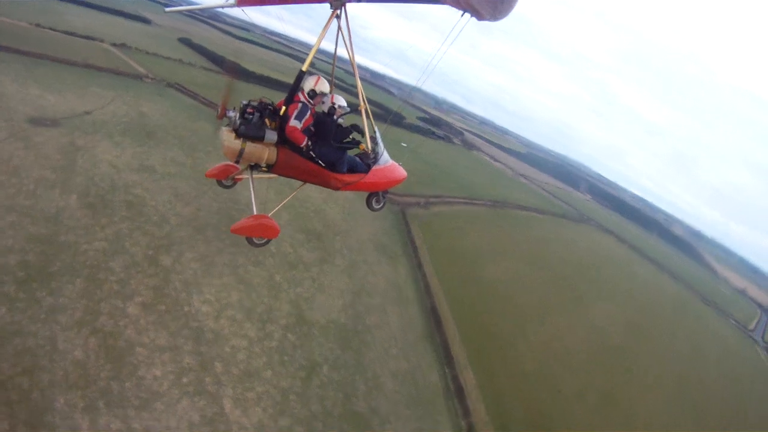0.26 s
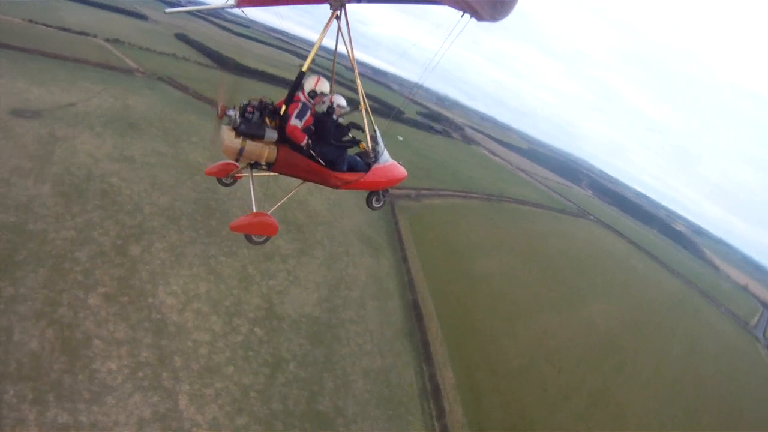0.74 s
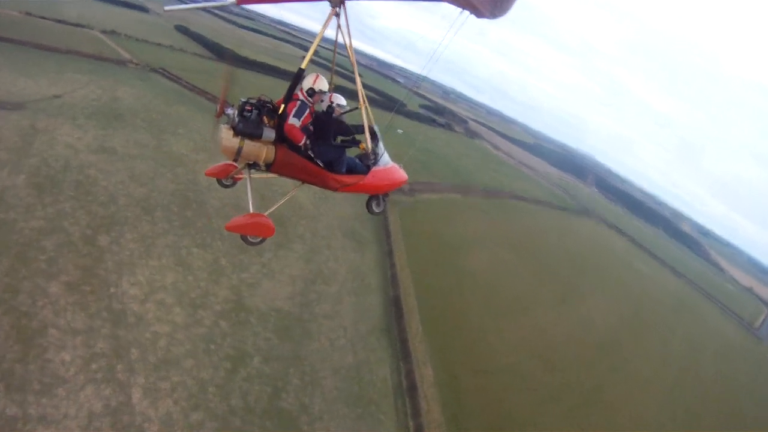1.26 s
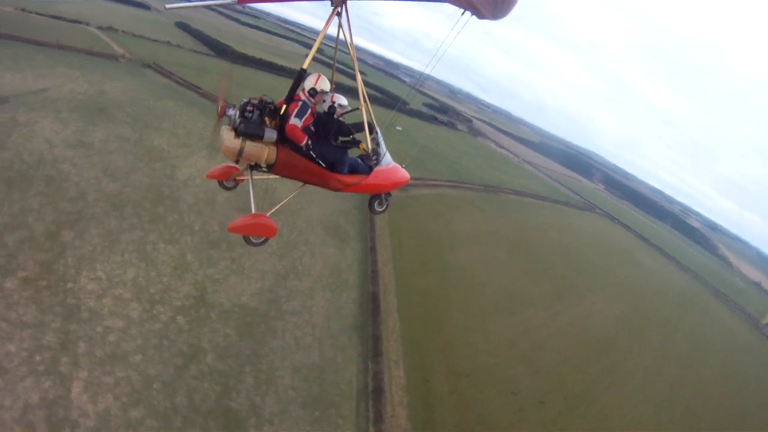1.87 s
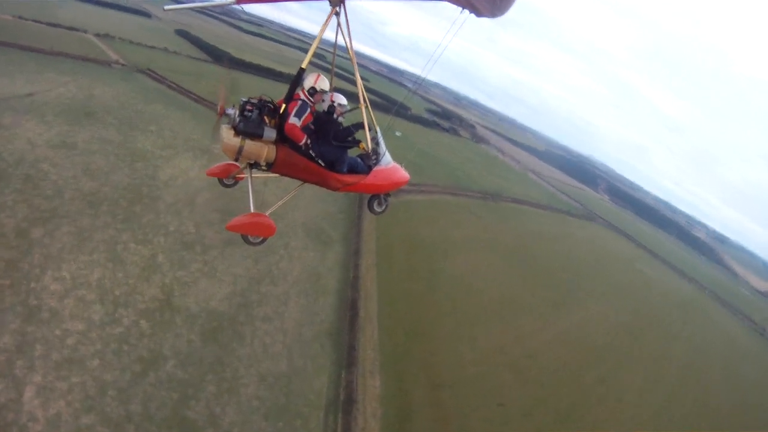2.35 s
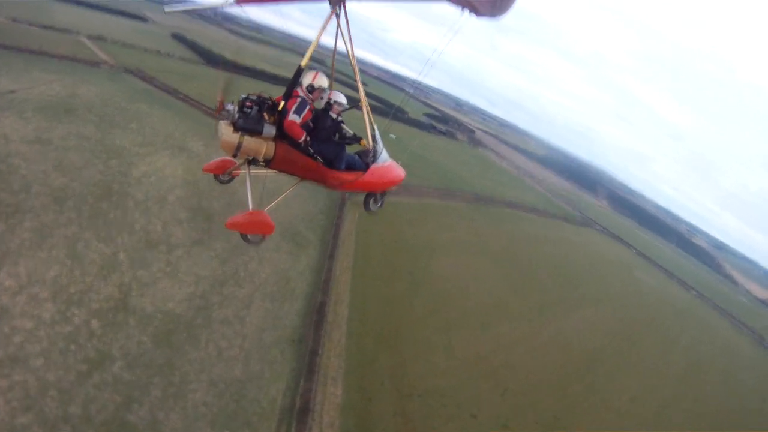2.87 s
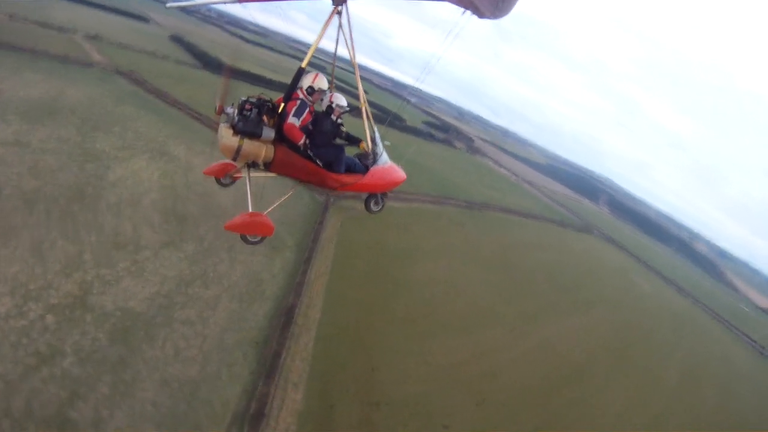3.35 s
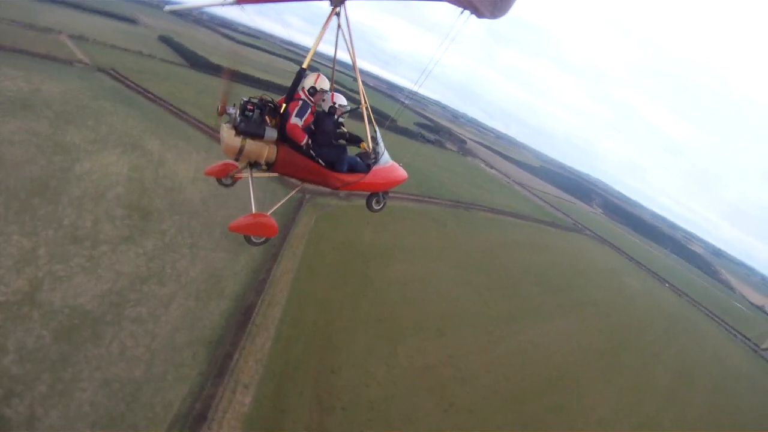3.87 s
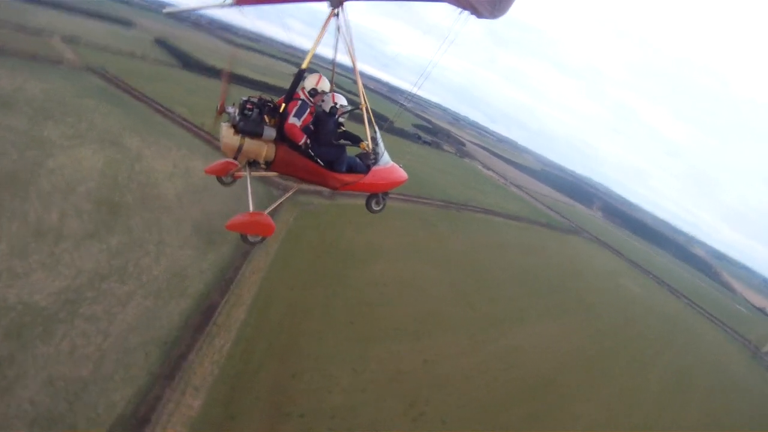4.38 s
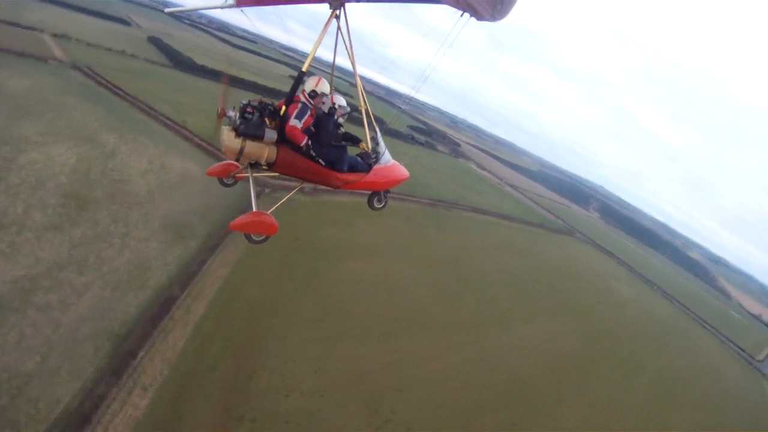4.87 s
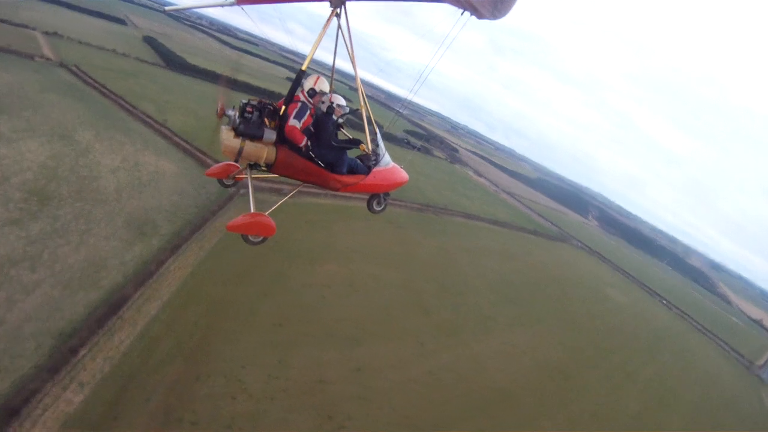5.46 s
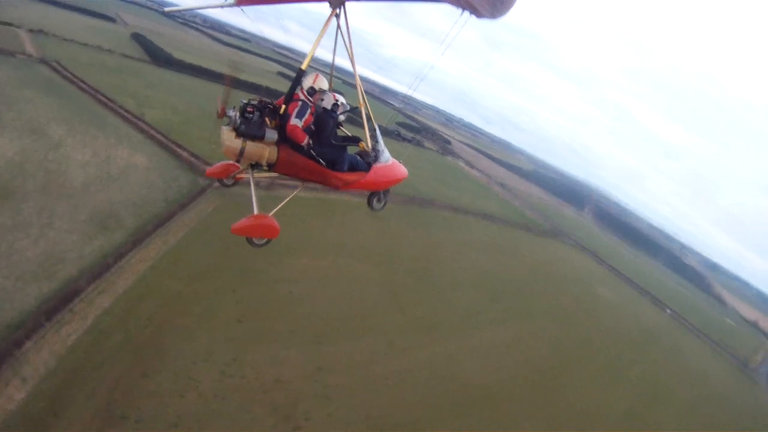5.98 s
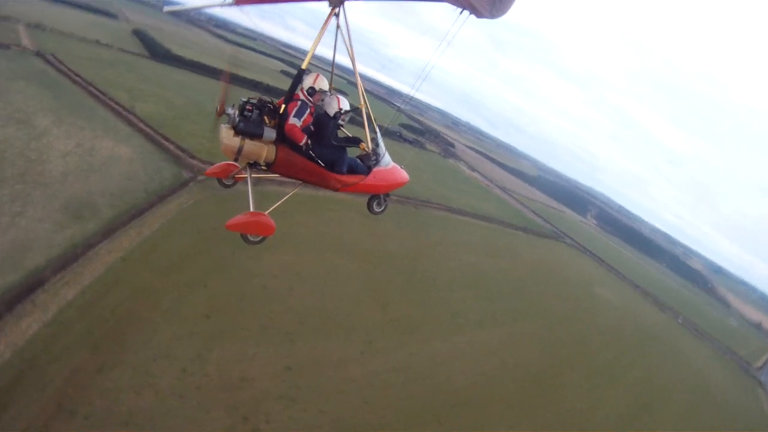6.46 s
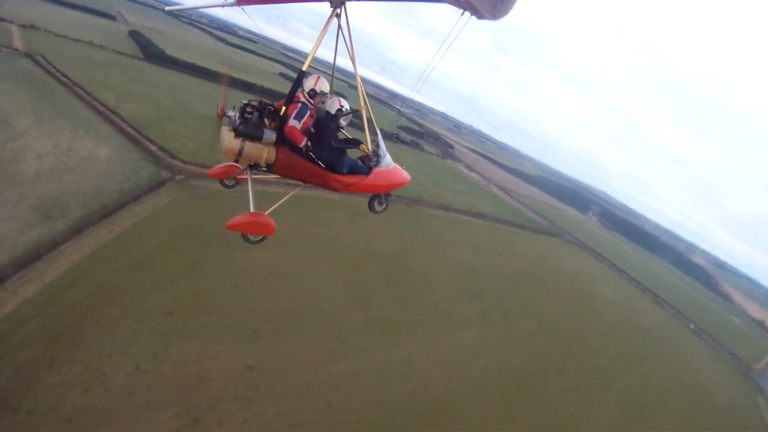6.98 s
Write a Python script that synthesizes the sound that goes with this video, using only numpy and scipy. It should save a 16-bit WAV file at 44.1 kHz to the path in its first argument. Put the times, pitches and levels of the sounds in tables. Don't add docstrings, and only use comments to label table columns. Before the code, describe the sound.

Steady, buzzing small-aircraft drone heard through the airframe, throbbing and pulsing irregularly while wind rumbles and a loose part rattles and knocks.

```python
import sys
import numpy as np
from scipy import signal
from scipy.fft import rfft, irfft, next_fast_len
from scipy.io import wavfile
from scipy.ndimage import uniform_filter1d

SR = 44100
rng = np.random.default_rng(int(sys.argv[2]) if len(sys.argv) > 2 else 0)


def digitize_waveform(pressure):
    field = np.atleast_2d(pressure).T
    bounded = np.clip(field, -1, 1)
    quanta = np.round(bounded * 32767).astype(np.int16)
    wavfile.write(sys.argv[1], SR, quanta)


def boost_factor(decibels):
    exponent = np.asarray(decibels, float) / 20
    return 10 ** exponent


N = 318843

# start_s [s], peak_db [dB], pitch_hz [Hz]
LOUD_KNOCKS = [(0.0521, -6, 1240), (0.084, -3.5, 1170), (0.1252, -4.5, 1210), (0.5663, -4, 1200),
               (0.6403, -6, 1260), (0.7518, -11, 1090), (1.055, -5.5, 1240), (1.6336, -1.5, 1205),
               (1.7282, -7, 1210), (1.766, -4.5, 1130), (1.899, -6, 1214), (1.9608, -4, 1150),
               (2.056, -4.5, 1200), (2.215, -2.5, 1180), (2.3472, -8, 1200), (2.8669, -5, 1230),
               (2.904, -2, 1160), (4.4, -6.5, 1140), (4.5267, -6, 1140), (4.7245, -5.5, 1170),
               (4.794, -1.5, 1170), (5.3, -8, 1170), (5.6264, -6, 1200), (6.0505, -3.5, 1150),
               (6.0825, -8, 1180), (6.1555, 0, 1240), (6.318, -9, 1200), (6.9534, -4, 1210),
               (7.094, 1.5, 1190), (7.168, -1, 1220)]
# centre_s [s], depth_db [dB], length_s [s], following_swell_db [dB]
SWING_LULLS = [(0.049, 11, 0.025, -17.5), (.54, 3, 0.033, -18), (0.693, 10, .025, -17),
               (0.849, 5, 0.033, -18), (1.37, 10, 0.041, -15.5), (1.547, 20, 0.038, -17),
               (1.705, 6, .03, -18), (2.062, 17, 0.014, -18.5), (2.29, 20, 0.039, -16.5),
               (2.837, 9, 0.027, -16.5), (2.966, 17, 0.026, -13), (3.1, 12, 0.045, -18),
               (3.381, 6, .04, -15), (3.51, 10, 0.029, -18), (3.683, 23, 0.038, -15.5),
               (3.874, 12, 0.032, -20), (4.101, -1, 0.045, -17.5), (4.23, 8, .03, -19),
               (4.59, 8, 0.043, -16), (4.726, 22, 0.037, -16.5), (4.98, 13, 0.045, -14),
               (5.14, 13, .05, -16), (5.321, 7, 0.047, -17), (5.683, 9, 0.064, -15.5),
               (5.904, 12, 0.022, -12.5), (5.994, 24, 0.038, -17), (6.115, 15, .025, -18.5),
               (6.46, 14, 0.034, -18), (6.794, 7, 0.049, -17), (7.01, 4, .07, -18)]


def rms_one(x):
    return x / np.sqrt(np.mean(x ** 2) + 1e-20)


def drift(rate_hz):
    r = np.exp(-80 * np.pi * rate_hz / SR)
    noise = rng.standard_normal(N // 40 + 2002)
    slow = signal.lfilter([1], [1, -2 * r, r * r], noise)[2000:]
    return np.interp(np.arange(N) / 40, np.arange(len(slow)), rms_one(slow))


def coloured(spectrum):
    size = next_fast_len(N)
    hz = np.arange(1, size // 2 + 2) * SR / size
    point_hz, point_db = np.transpose(spectrum)
    shape = boost_factor(np.interp(np.log(hz), np.log(point_hz), point_db, left=-200, right=-200))
    return rms_one(irfft(rfft(rng.standard_normal(size)) * shape, size)[:N])


def singing(edges_hz, evenness):
    band = signal.butter(2, edges_hz, "band", fs=SR, output="sos")
    x = signal.sosfilt(band, rng.standard_normal(N + 9000))[9000:]
    flicker = np.sqrt(uniform_filter1d(rms_one(x) ** 2, int(0.028 * SR)) + 0.26)
    return rms_one(x / flicker ** evenness)


def tones(turns, orders, levels_db, waver_db, slip):
    wobble = [drift(3.0) for _ in range(5)]
    total = np.zeros(N)
    for k, (order, db) in enumerate(zip(orders, levels_db)):
        gain = boost_factor(db + 3.5 + waver_db * wobble[k % 5])
        phase = order * turns + rng.random() + slip * wobble[(k + 2) % 5]
        total += gain * np.sin(2 * np.pi * phase)
    return total


def ring(clicks, hz, t60):
    r, w = boost_factor(-60 / (t60 * SR)), 2 * np.pi * hz / SR
    return signal.lfilter([0, np.sin(w)], [1, -2 * r * np.cos(w), r * r], clicks + 1e-18)


def bumps(s, rise_db, length_s):
    t = np.arange(0, N + 64, 64)[:, None] / SR
    rise = np.sum(rise_db * np.exp(-((t - s) / length_s) ** 2), axis=1)
    return np.interp(np.arange(N) / SR, t[:, 0], rise)


def shake():
    # centre_s [s], length_s [s], buzz_rise_db [dB], boom_rise_db [dB]
    gusts = [(0.07, 0.077, 2.5, 2), (0.31, 0.061, 5.5, 6.5), (0.61, 0.082, 3, 3), (0.758, 0.034, 6.5, 5),
             (0.99, 0.1, 2, 1), (1.258, .07, 4, 2.5), (1.39, 0.067, 5, 9.5), (1.63, 0.091, 3.5, 4),
             (1.765, .05, 2.5, 3.5), (1.958, 0.052, 4, 9), (2.156, 0.11, 4.5, 2), (2.319, 0.072, 6, 6.5),
             (2.96, 0.17, 3, 7), (3.217, 0.068, 4, 6), (3.406, 0.067, 5.5, 5), (3.56, 0.049, 4, 8.5),
             (3.74, 0.064, 3.5, 4.5), (3.924, 0.047, 2.5, 8), (4.102, .06, 5, 7), (4.27, 0.036, 3, 8),
             (4.408, 0.067, 4, 1), (4.594, 0.073, 4, 8.5), (4.796, 0.067, 5.5, 8.5),
             (5.002, 0.037, 2.5, 11), (5.29, 0.26, 3, 5.5), (5.708, 0.095, 5, 10), (6.083, 0.086, 5, 6.5),
             (6.321, 0.02, 6, 8.5), (6.51, 0.087, 6, 7.5), (7.035, 0.28, 3, 4)]
    # centre_s [s], rise_db [dB]
    hums = [(0.0, 8), (.2, 9), (.4, 7), (.765, 13), (1.06, 21.5), (1.38, 20), (1.6, 13), (2.13, 3),
            (2.32, 20), (2.89, 12), (3.07, 1), (3.4, 15.5), (3.57, 13), (3.74, 12.5), (3.98, 6), (4.35, 11),
            (4.67, 4), (4.845, 6), (5.1, 9), (5.27, 9), (5.44, -5), (5.72, 14), (5.85, 11), (6.12, 16),
            (6.37, 14), (6.55, 8), (6.75, 20), (7.05, 12.5), (7.22, 18.5)]
    s, length_s, buzz_rise_db, boom_rise_db = np.transpose(gusts)
    hum_s, hum_rise_db = np.transpose(hums)
    buzz_db = -32 + bumps(s, buzz_rise_db, length_s)
    boom_db = -27 + bumps(s, boom_rise_db, length_s)
    hum_db = -36 + bumps(hum_s, hum_rise_db, 0.074)
    return buzz_db, boom_db, hum_db


def wind_buffet(hum_db):
    # freq_hz [Hz], density_db [dB per Hz]
    buffet_spectrum = [(20, -34), (30, -14), (46, -3), (58, -3), (68, -9), (82, -11), (99, -8), (112, -9),
                       (128, -11), (150, -13), (200, -40), (330, -120)]
    return boost_factor(-26.5 + 0.25 * (hum_db + 36.5)) * coloured(buffet_spectrum)


def strut_hum(hum_db):
    return boost_factor(-28 + 0.63 * (hum_db + 27.5)) * singing((94, 104), evenness=0.59)


def case_boom(boom_db):
    # freq_hz [Hz], density_db [dB per Hz]
    boom_spectrum = [(74, -27), (125, -14.5), (156, -8), (186, -5), (228, -6.5), (250, -3), (272, -45),
                     (300, -29), (325, -25), (385, -42), (520, -29), (620, -35), (810, -39), (1360, -120)]
    boom = boost_factor(-23 + 0.42 * (boom_db + 24.5)) * coloured(boom_spectrum)
    mode = boost_factor(-28 + 1.6 * (boom_db + 22)) * singing((226, 254), evenness=.5)
    return boom + mode


def airframe_noise(cycles):
    # freq_hz [Hz], density_db [dB per Hz]
    buzz_spectrum = [(350, -10), (600, -18), (648, -1), (674, 3), (849, -2), (917, -5.5), (1070, -1),
                     (1220, -0.5), (1270, 1.5), (1340, -11), (1400, -10), (1610, 2), (1770, -8),
                     (1900, -3.5), (2470, -38), (4180, -120)]
    # freq_hz [Hz], density_db [dB per Hz]
    whine_spectrum = [(1060, -24.5), (1800, -13.5), (2070, -5.5), (2180, -4.5), (2400, -12), (2640, -9),
                      (2800, -12), (3040, -27), (3100, -39), (4030, -27.5), (6820, -120)]
    # freq_hz [Hz], density_db [dB per Hz]
    hiss_spectrum = [(2500, -45), (3000, -11), (3470, -3), (3720, -11.5), (3870, -11.5), (4150, -21),
                     (4430, -17), (4600, -10.5), (4750, -14), (4900, -9), (5120, -14.5), (5280, -12),
                     (5480, -16), (5820, -16.5), (6300, -32)]
    firing = 1 + .12 * np.cos(4 * np.pi * cycles) + .1 * np.cos(8 * np.pi * cycles)
    buzz = boost_factor(-28.5 + 0.37 * drift(21)) * coloured(buzz_spectrum)
    whine = boost_factor(-30.5 + 0.48 * drift(25)) * coloured(whine_spectrum) * firing ** 0.19
    hiss = boost_factor(-40 + .5 * drift(30)) * coloured(hiss_spectrum) * firing
    flutter = boost_factor(1.1 * drift(40))
    return flutter * (buzz + whine + hiss)


def knock_jolt():
    knock_s, knock_db, _ = np.transpose(LOUD_KNOCKS)
    return boost_factor(bumps(knock_s, 1 + .2 * knock_db, 0.036))


def propeller(cycles):
    blade_orders = [1, 2, 5, 9, 11, 17, 18, 20, 24, 29, 34, 36]
    blade_levels = [-41, -31, -60, -54, -56, -47, -50, -50, -50, -56, -64, -62]
    shaft = 2 / 2.325
    return boost_factor(2.0) * tones(3 * shaft * cycles, blade_orders, blade_levels, waver_db=1.0, slip=0.028)


def engine_cycles():
    # time_s [s], rate_hz [cycles per s]
    engine_speed = [
        (0.0, 35.532),
        (0.8, 35.94),
        (1.3, 36.19),
        (1.9, 36.32),
        (2.8, 36.345),
        (4.4, 36.32),
        (5.2, 36.395),
        (6.0, 36.292),
        (7.25, 36.145),
    ]
    s, rate_hz = np.transpose(engine_speed)
    return np.cumsum(np.interp(np.arange(N) / SR, s, rate_hz)) / SR


def engine(cycles):
    engine_orders = [.575, 2, 12, 29.5, 41, 46, 47, 49, 51, 53, 57, 58, 59, 61, 63, 65, 67, 71, 78, 79, 80,
                     81, 86, 88, 90, 92, 99]
    engine_levels = [-36, -38, -62, -49, -50, -48, -55, -58, -55, -50, -50, -52, -42, -48, -53, -52, -57,
                     -55, -60, -58, -52, -63, -64, -61, -62, -64, -64]
    return boost_factor(2.05) * tones(cycles, engine_orders, engine_levels, waver_db=2.0, slip=0.11)


def swing_angle(cycles):
    mount = .838
    lulls = np.zeros(N)
    lulls[(np.array(SWING_LULLS)[:, 0] * SR).astype(int)] = np.pi
    lost = uniform_filter1d(np.cumsum(lulls), int(.02 * SR))
    return np.pi * (1 + mount) * cycles - lost + 2 * np.pi * .1 * drift(3.0)


def swing_level():
    sag_db, sag_s, edge_s = 5.0, 0.058, .03
    s, depth_db, length_s, swell_db = np.transpose(SWING_LULLS)
    t = np.arange(N) / SR
    last = np.maximum(np.searchsorted(s, t) - 1, 0)
    swell = swell_db[last] + 8 - sag_db * (1 - np.exp(-np.abs(t - s[last]) / sag_s))
    return uniform_filter1d(swell, int(edge_s * SR)) - bumps(s, depth_db, length_s)


def taps(buzz_db):
    swing_s = .0329
    loud_s = np.append(np.array(LOUD_KNOCKS)[:, 0], N / SR)
    gaps = []
    for a, b in zip(loud_s, loud_s[1:]):
        swings = max(round((b - a) / swing_s), 1)
        gaps.append(np.linspace(a, b, swings + 1)[1:-1])
    s = np.concatenate(gaps)
    chance = rng.standard_normal((len(s), 3))
    gust_db = buzz_db[(s * SR).astype(int)] + 28.0
    db = -14.5 + 0.83 * gust_db + 7.5 * np.minimum(chance[:, 0], 1)
    pitch_hz = 1200 + 41 * chance[:, 1]
    return np.c_[s + .002 * chance[:, 2], db, pitch_hz]


def loose_part(angle, buzz_db):
    crest = (.5 + .5 * np.cos(angle)) ** 5
    touches = (rng.random(N) < 700 * crest / SR) * rng.standard_normal(N)
    out = boost_factor(-35) * (ring(touches, 1235, .04) - .7 * ring(touches, 1090, .03))
    knocks = np.r_[LOUD_KNOCKS, taps(buzz_db)]
    strengths = rng.standard_normal((len(knocks), 6))
    first = np.eye(1, 3000, 20)[0]
    for (s, db, hz), parts in zip(knocks, strengths):
        at = max(round((s - .0012) * SR), 0)
        burst = np.zeros(3000)
        contacts = np.round(np.arange(4) * SR / hz).astype(int)
        burst[contacts] = 1 + .25 * parts[:4]
        beside = parts[4] * ring(first, 1653, 0.039) + parts[5] * ring(first, 2280, 0.016)
        knock = boost_factor(db - 20.0) * (ring(burst, hz, 0.021) + beside)
        out[at:at + 3000] += knock[:N - at]
    return out


def gain_steps(recovery_s):
    # start_s [s], depth_db [dB]
    duck_steps = [(0.171, 4), (0.785, 4), (1.076, 5), (1.48, 3), (1.641, 3), (2.11, 3.5), (2.93, 4.5),
                  (3.042, 5), (3.284, 1), (3.436, 5), (3.748, 5.5), (3.947, 2.5), (4.148, 3.5), (4.293, 3),
                  (4.658, 1), (4.817, 3), (5.069, 5), (5.248, 3), (5.417, 5.5), (5.782, 4.5), (6.176, 4),
                  (6.693, 3.5), (7.191, 2)]
    t = np.arange(N) / SR
    return sum(db * np.exp(-np.clip(t - s, 0, None) / recovery_s) * (t >= s) for s, db in duck_steps)


def scene():
    cycles = engine_cycles()
    buzz_db, boom_db, hum_db = shake()
    wind = wind_buffet(hum_db) + strut_hum(hum_db) + case_boom(boom_db)
    load = boost_factor(buzz_db + 28.5)
    steady = load * (knock_jolt() * airframe_noise(cycles) + engine(cycles) + propeller(cycles))
    duck = boost_factor(-uniform_filter1d(gain_steps(0.089), 130))
    angle = swing_angle(cycles)
    swing = boost_factor(swing_level()) * np.cos(angle)
    mono = swing + duck * (wind + steady) + loose_part(angle, buzz_db)
    return np.array([mono, mono])


def channel_difference():
    # freq_hz [Hz], density_db [dB per Hz]
    apart_spectrum = [(12, -34), (20, 12), (129, -6), (555, -3), (1110, -22), (4510, -25), (5980, -34),
                      (7340, -27), (9000, -27), (11700, -68), (19800, -120)]
    return boost_factor(-58 + 4.0 * gain_steps(.02)) * coloured(apart_spectrum) * [[1], [-1]]


def top_cut(x):
    return signal.sosfilt(signal.butter(12, 15680, fs=SR, output="sos"), x)


def record(dry):
    low_cut = signal.butter(4, 14.8, "high", fs=SR, output="sos")
    cut = signal.sosfilt(low_cut, dry)
    limited = 1.4 * np.tanh(cut / 1.4)
    slow = signal.resample_poly(limited, 40, 147, axis=1)
    held = signal.resample_poly(np.repeat(slow, 4, axis=1), 147, 160, axis=1)[:, :N]
    held = np.pad(held, ((0, 0), (0, N - held.shape[1])))
    stereo = held + channel_difference()
    size = 2 ** 19
    below_top = np.arange(size // 2 + 1) * SR / size < 15290
    mix = irfft(rfft(stereo, size) * below_top, size)[:, :N]
    return top_cut(mix)


dry = scene()
out = record(dry)
digitize_waveform(out)
```